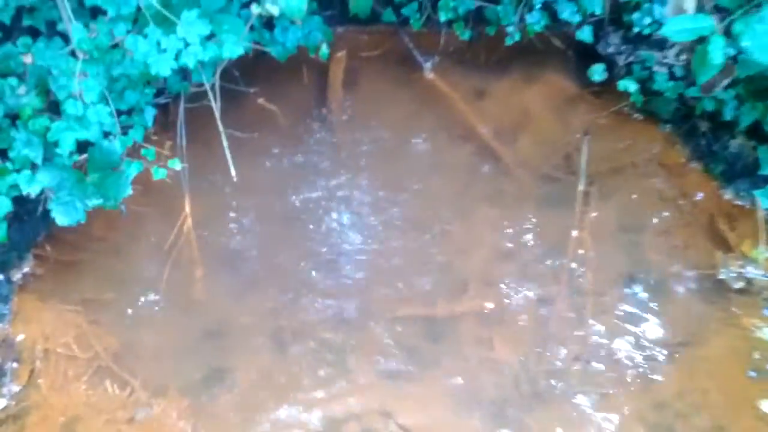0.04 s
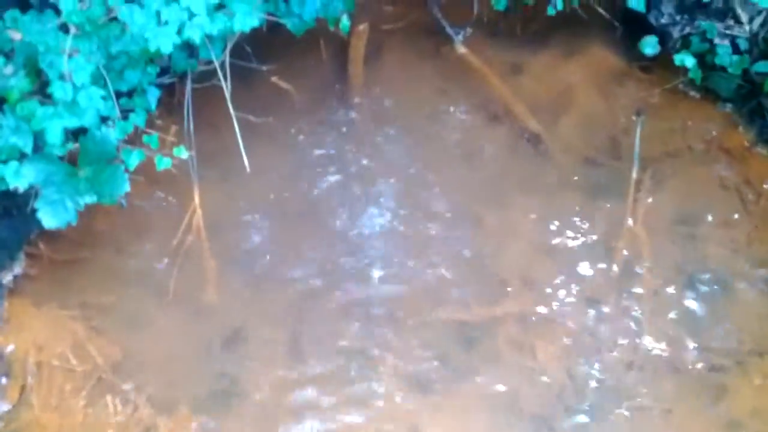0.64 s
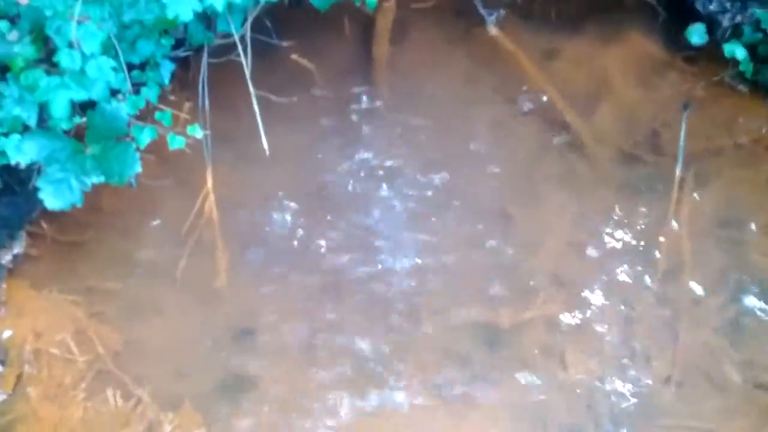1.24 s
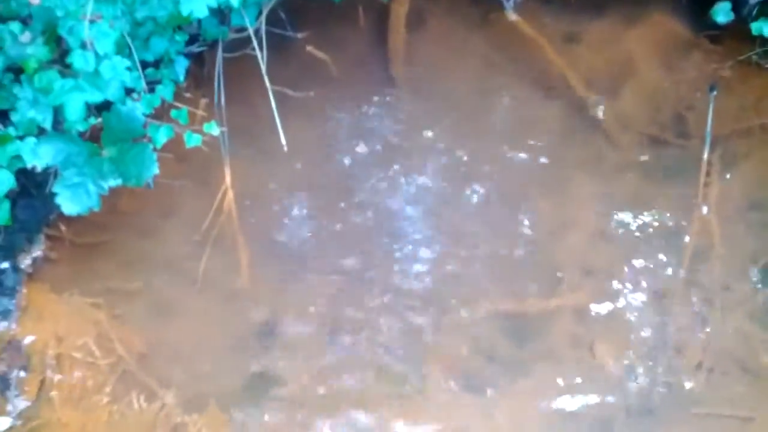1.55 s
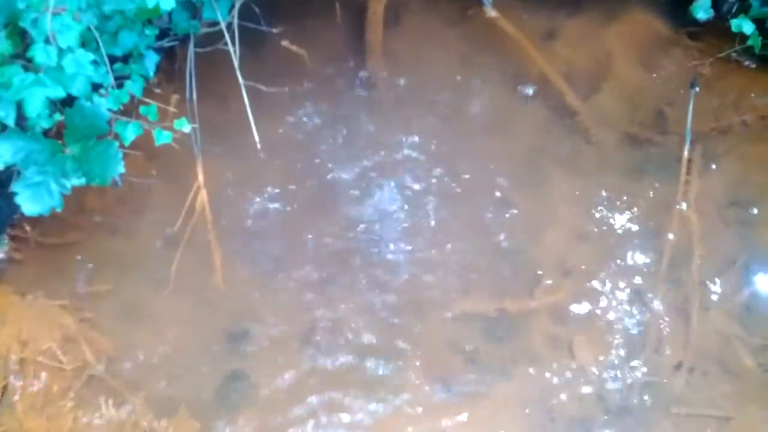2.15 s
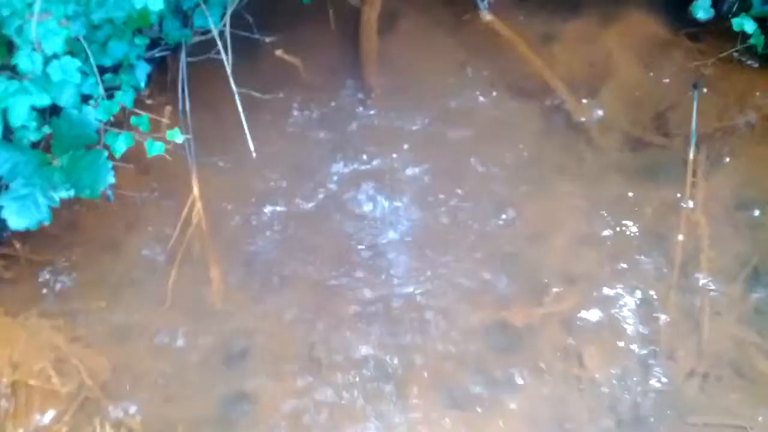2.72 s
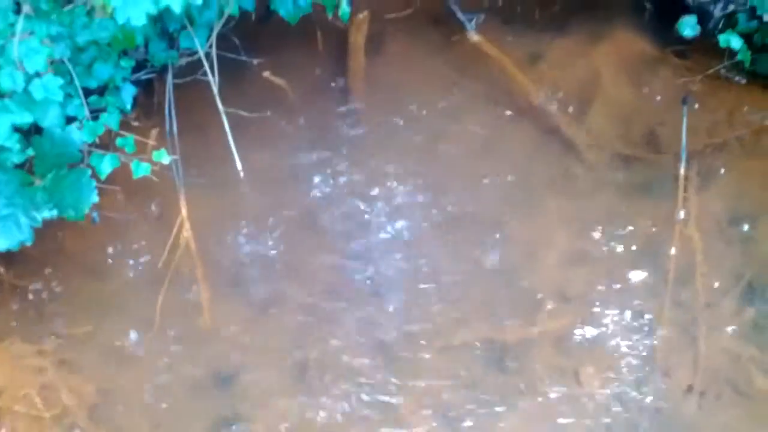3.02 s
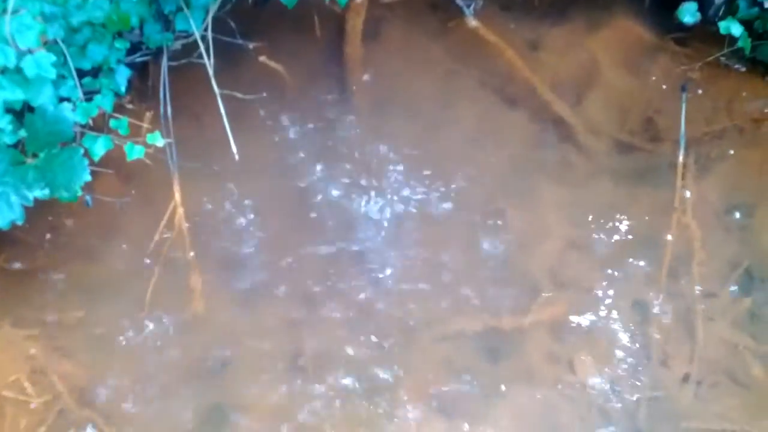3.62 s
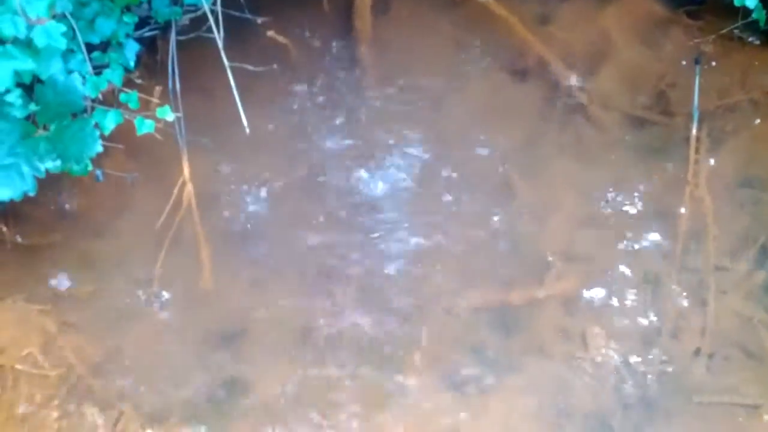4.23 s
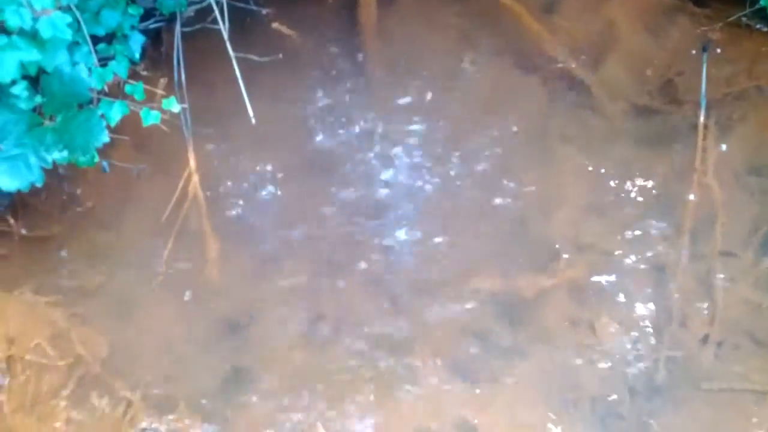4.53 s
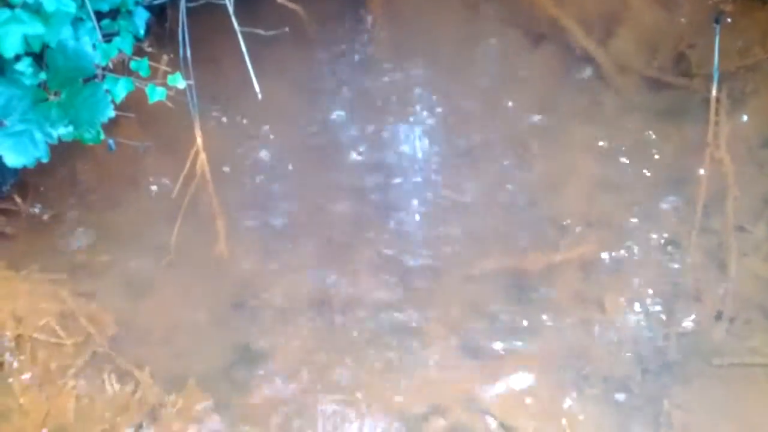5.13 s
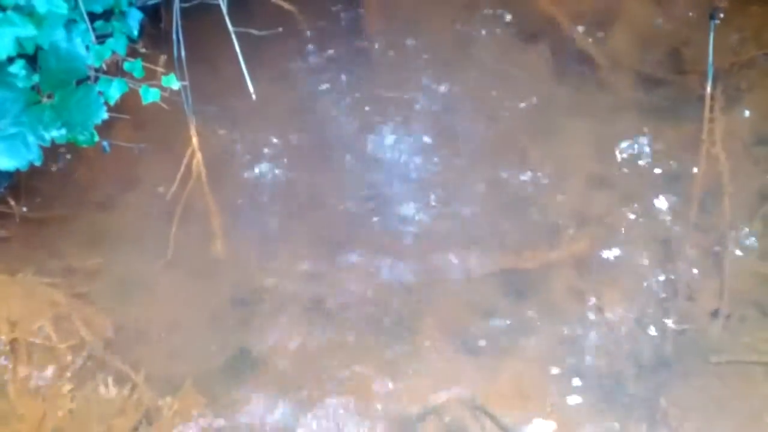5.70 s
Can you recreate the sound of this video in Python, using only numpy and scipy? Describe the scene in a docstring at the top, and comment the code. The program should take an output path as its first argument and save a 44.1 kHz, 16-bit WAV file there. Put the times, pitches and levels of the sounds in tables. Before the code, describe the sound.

Fingers knock and rub on a camera over the gentle gurgle, small blips and fine sizzle of welling water.

```python
"""A soft wash of tiny bubbles, single rising blips and a fine, fluttering sizzle: a shallow spring pool
wells up outdoors. Larger bubbles ring upward in pitch as they near the surface; minute ones burst in
flurries, and a few pop close by. Early on, fingers knock and rub on a handheld camera, sharp and loud
over the water. Faint low hums come and go over a rumble, and a thin whistle wavers in the first second."""
import sys
import numpy as np
from scipy.fft import rfft, irfft, next_fast_len
from scipy.io import wavfile
from scipy.ndimage import map_coordinates

SR = 44100
rng = np.random.default_rng(int(sys.argv[2]) if len(sys.argv) > 2 else 0)


def generate_wav(signal):
    """Clip the signal to [-1, 1] and save it as 16-bit WAV at the path in sys.argv[1]."""
    frames = np.transpose(np.atleast_2d(signal))
    scaled = np.clip(frames, -1, 1) * 32767
    pcm = np.round(scaled).astype(np.int16)
    wavfile.write(sys.argv[1], SR, pcm)


N = 262836

# strength of the welling flow: time_s, level_db
FLOW_LEVEL = [(0.0, -58), (1.78, -61), (4.23, -61.5), (5.06, -61.5), (5.96, -62)]
# tone colour of the wash: frequency_hz, level_db
WASH_SPECTRUM = [(60, -20), (100, 0.5), (150, -1.5), (260, -2), (400, -5.5), (560, -3.5), (730, -6.5),
                 (980, -3), (1500, -7.5), (2300, -16), (4500, -20), (8000, -21.5)]
# larger bubbles reaching the surface: start_s, middle_pitch_hz, level_db
RISING_BUBBLES = [(0.849, 1060, -50), (1.396, 569, -52.5), (1.785, 2560, -56), (1.797, 890, -50),
                  (2.295, 686, -47.5), (2.316, 965, -48.5), (2.529, 2800, -57.5), (2.714, 560, -49.5),
                  (3.015, 628, -53), (3.050, 1040, -52), (3.114, 525, -55.5), (3.187, 3130, -59),
                  (3.726, 1700, -54.5), (4.250, 1510, -52), (4.26, 2020, -58), (4.490, 577, -53.5),
                  (4.544, 1040, -52.5), (4.566, 1760, -58), (4.684, 555, -55), (4.756, 522, -54),
                  (5.148, 516, -49.5), (5.520, 592, -49.5), (5.548, 525, -52.5), (5.655, 528, -50)]
# tone colour of the sizzle: frequency_hz, level_db
SIZZLE_SPECTRUM = [(1500, -43), (3000, -20), (4600, -18), (6000, -13), (7400, -14), (9000, -8),
                   (10500, -3.5), (11900, 1.5), (14500, 1), (15800, -2.5)]
# small bubbles bursting close by: start_s, level_db, pitch_hz, t60_s
CLOSE_POPS = [(3.487, -42, 11100, 0.008), (3.744, -42.5, 11700, 0.021), (4.220, -44, 12500, 0.004),
              (4.382, -45, 9500, 0.018), (5.619, -44, 14000, 0.0082), (5.844, -55, 4010, 0.02)]
# fingers striking the camera: start_s, click_db, brightness_hz, thump_db, thump_pitch_hz
FINGER_KNOCKS = [(0.2482, -12.5, 3740, -18, 600), (0.2810, -48, 1200, -29.5, 550),
                 (0.3469, -44, 900, -19, 680), (0.3909, -19.5, 3080, -16.5, 870),
                 (0.3922, -27, 5500, -11, 234), (0.465, -52, 1500, -36, 280), (0.498, -52, 1200, -34, 229),
                 (0.5097, -52, 1200, -35.5, 340), (0.8703, -36, 2770, -41, 700),
                 (1.089, -7, 18000, -24.5, 455), (1.12, -40, 7000, -70, 500), (1.25, -13, 17800, -35, 387),
                 (1.2647, -19.5, 18000, -26.5, 830), (1.6690, -34, 1960, -48, 600)]
# ringing modes of the camera's shell: pitch_hz, level_db, t60_s
SHELL_MODES = [(486, -21, 0.036), (1220, -16, 0.013), (1693, -8, 0.0079), (2710, -3.5, 0.0044),
               (3580, -0.5, 0.0037), (6200, 2, 0.0015), (12240, -3.5, 0.0019), (14700, -0.5, 0.0013)]
# jolts as the grip shifts: start_s, level_db
GRIP_JOLTS = [(1.089, -23), (1.2503, -18)]
# skin sliding on the shell: start_s, length_s, level_db, brightness_hz
FINGER_RUBS = [(0.242, 0.011, -31.5, 4500), (0.341, 0.025, -41, 8000), (0.468, 0.05, -41, 900),
               (1.194, 0.09, -46.5, 14100), (1.235, 0.035, -29.5, 20000)]
# tone colour of a rub: frequency_hz, level_db
RUB_SPECTRUM = [(40, -13), (150, 2.5), (400, -3.5), (900, -5.5), (1600, -5.5), (2300, -14.5), (3800, -9),
                (6200, -15.5), (8000, -13), (12000, -3.5), (16000, -23)]
# low hums that swell and fade: start_s, attack_s, hold_s, release_s, start_pitch_hz, level_db
LOW_HUMS = [(-1.22, 3.46, .7, 2.75, 65.2, -60.5), (0.0, 0.98, 1.5, 0.76, 48.5, -64),
            (3, 1.06, 2.2, .5, 46.6, -61)]
# pitch line of the thin whistle: time_s, pitch_hz
WHISTLE_PITCH = [(0.10, 10950), (0.22, 10650), (0.36, 10100), (0.46, 10440), (0.53, 10050), (0.61, 10700),
                 (0.80, 10150)]
# tone colour of the rumble: frequency_hz, level_db
RUMBLE_SPECTRUM = [(15, 6.5), (40, 2), (90, -5.5), (140, -2.5), (300, -40), (1000, -74)]


def water():
    """The welling flow: a restless wash with tiny bubbles gurgling and tinkling in it."""
    wash_db, gurgle_db, tinkle_db = 3, -6.5, -18  # relative to the flow
    wash = coloured(rng.standard_normal(N), WASH_SPECTRUM)
    wash *= amp(wash_db + 0.65 * wobble(32) + 0.35 * wobble(5.38))
    gurgle = tiny_bubbles(count=1200, centre_hz=949.4, cycles=12, rise=0.21, spread_db=3)
    tinkle = tiny_bubbles(count=400, centre_hz=5720, cycles=37.5, rise=0.124, spread_db=3.5)
    return amp(curve(FLOW_LEVEL)) * (wash + amp(gurgle_db) * gurgle + amp(tinkle_db) * tinkle)


def tiny_bubbles(count, centre_hz, cycles, rise, spread_db):
    """A crowd of short, damped bubble tones, each gliding upward."""
    t = np.arange(SR // 40) / SR
    starts = rng.integers(0, N, (count, 1))
    pitch, strength = np.clip(rng.standard_normal((count, 2)), -2, 2).T[:, :, None]
    hz = centre_hz * 2 ** (0.701 * pitch)
    age = t * hz / cycles
    envelope = amp(spread_db * strength) * age * np.exp(-4 * age)
    tones = envelope * np.sin(2 * np.pi * hz * t * (1 + rise * age / 2))
    positions = starts + np.arange(len(t))
    return unit(np.bincount(positions.ravel(), tones.ravel(), minlength=N)[:N])


def blips():
    """A larger bubble rings ever higher as it nears the surface; its wobbling shape shakes the tone."""
    rise_oct_per_s = 8.7
    out = np.zeros(N)
    quiver, flutter_db = 1 + 0.038 * wobble(260), 2.5 * wobble(140)
    for start_s, middle_hz, db in RISING_BUBBLES:
        length_s = 0.045 * (500 / middle_hz) ** 0.57  # small, high bubbles die sooner
        progress = np.linspace(0, 1, int(length_s * SR))
        now = round(start_s * SR) + np.arange(len(progress))
        hz = middle_hz * 2 ** (rise_oct_per_s * length_s * (progress - 0.5)) * quiver[now]
        envelope = np.sin(np.pi * progress) * (1 - progress / 2)
        add(out, start_s, amp(db + flutter_db[now]) * envelope * sine(hz))
    return out


def sizzle():
    """Minute bursts come in flurries, stronger with the flow; coarse and fine ones flutter partly apart."""
    lull_at_s, lull_width_s, lull_depth_db = 1.48, 0.14, 4  # one brief dip in level
    lull_db = lull_depth_db * np.exp(-((np.arange(N) / SR - lull_at_s) / lull_width_s) ** 2)
    flow_db = curve(FLOW_LEVEL)
    level_db = -48 + 0.25 * (flow_db - flow_db.mean()) - lull_db
    fizz = crackle(N, per_s=5000, spread_db=5) + 0.5 * rng.standard_normal(N)
    ticks = 0.42 * crackle(N, per_s=150, spread_db=3.5)
    bursts = coloured(fizz + ticks, SIZZLE_SPECTRUM)
    coarse = filtered(bursts, lambda hz: 1 / (1 + (hz / 11000) ** 12))
    fine = bursts - coarse
    fluttering = coarse * amp(0.8 * wobble(60)) + fine * amp(0.46 * wobble(70))
    flurries_db = 0.62 * np.tanh(wobble(34)) + 3 * np.tanh(wobble(85)) + 0.91 * wobble(240)
    return amp(level_db) * unit(fluttering * amp(flurries_db))


def pops():
    """A bubble's film tears with a short, high spit."""
    out, t = np.zeros(N), np.arange(SR // 20) / SR
    for start_s, db, hz, t60_s in CLOSE_POPS:
        spit = coloured(rng.standard_normal(len(t)), [(hz / 2, -22), (hz, 0), (hz * 2, -35)])
        add(out, start_s, amp(db - 60 * t / t60_s) * spit)
    return out


def knocks():
    """A finger rings the shell and thumps it against the grip; a soft touch loses the high modes."""
    rise_cycles, after_ring_cycles = 0.41, 1.3  # the hand damps the thump quickly
    out, t = np.zeros(N), np.arange(SR // 20) / SR
    for start_s, click_db, bright_hz, thump_db, thump_hz in FINGER_KNOCKS:
        click = np.zeros(len(t))
        for k, (hz, db, t60_s) in enumerate(SHELL_MODES):
            fingertip_spring = 1 / np.hypot(1 - (hz / bright_hz) ** 2, 0.89 * hz / bright_hz)
            decay = amp(db + rng.normal(0, 0.42) - 60 * t / t60_s)
            click += (-1) ** k * fingertip_spring * decay * np.sin(2 * np.pi * hz * t)
        age = t * thump_hz / rise_cycles
        punch = age ** 2 * np.exp(2 - 2 * age)
        after_ring = amp(-16) * np.tanh(age) * np.exp(-t * thump_hz / after_ring_cycles)
        thump = (punch + after_ring) * np.sin(2 * np.pi * thump_hz * t)
        add(out, start_s, amp(click_db) * click + amp(thump_db) * thump)
    return out


def jolts():
    """A shift of the grip gives the microphone one low push."""
    rise_s = 0.00044
    out, age = np.zeros(N), np.arange(SR // 20) / SR / rise_s
    for start_s, db in GRIP_JOLTS:
        add(out, start_s, amp(db) * age * np.exp(1 - age))
    return out


def rubs():
    """A finger slips over the shell in dense little catches; a light touch sounds dull."""
    out = np.zeros(N)
    for start_s, length_s, db, bright_hz in FINGER_RUBS:
        slips = coloured(crackle(SR // 8, per_s=7000, spread_db=6.5), RUB_SPECTRUM)
        slips = filtered(slips, lambda hz: 1 / np.hypot(1, hz / bright_hz))[:int(length_s * SR)]
        progress = np.linspace(0, 1, len(slips))
        stroke = np.abs(np.sin(np.pi * progress ** 1.4)) ** 0.5
        add(out, start_s, amp(db) * stroke * slips)
    return out


def hums():
    """Low, wavering hums slowly sag in pitch, like far-off motors."""
    sag_hz_per_s, waver_hz = 0.5, 0.6
    out = np.zeros(N)
    for start_s, attack_s, hold_s, release_s, start_hz, db in LOW_HUMS:
        t = np.arange(N) / SR - start_s
        envelope = amp(db + 2.05 * wobble(4)) * swell(t, attack_s, hold_s, release_s)
        hz = start_hz - sag_hz_per_s * t + waver_hz * wobble(6)
        out += envelope * np.sqrt(2) * sine(hz)
    return out


def whistle():
    """A thin, very high tone trembles in pitch and level."""
    start_s, end_s, fade_s = WHISTLE_PITCH[0][0], WHISTLE_PITCH[-1][0], 0.05
    envelope = swell(np.arange(N) / SR - start_s, fade_s, end_s - start_s - 2 * fade_s, fade_s)
    level_db = -65 + 2 * wobble(27.7)
    hz = curve(WHISTLE_PITCH) + 30 * wobble(130)
    return amp(level_db) * envelope * np.sqrt(2) * sine(hz)


def rumble():
    """A faint, steady bed of deep noise."""
    return amp(-65) * coloured(rng.standard_normal(N), RUMBLE_SPECTRUM)


def amp(db):
    """Decibels to gain."""
    return 10 ** (np.asarray(db) / 20)


def unit(x):
    """Scale to rms 1."""
    return x / np.sqrt(np.mean(x ** 2) + 1e-20)


def sine(hz):
    """A tone that follows a pitch curve."""
    return np.sin(2 * np.pi * np.cumsum(hz) / SR)


def curve(points):
    """Join (time_s, value) points into one value per sample."""
    return np.interp(np.arange(N) / SR, *np.transpose(points))


def swell(t, attack, hold, release):
    """Rise, hold and fall between 0 and 1, starting at t = 0."""
    return np.clip(np.minimum(t / attack, 1 - (t - attack - hold) / release), 0, 1)


def wobble(per_s):
    """A smooth drift through per_s random values a second."""
    return map_coordinates(rng.standard_normal(int(N * per_s / SR) + 4), [np.arange(N) * per_s / SR])


def crackle(size, per_s, spread_db):
    """Scattered tiny impulses of uneven strength, at rms 1."""
    chance, strength, sign = rng.random(size), rng.standard_normal(size), rng.choice([-1, 1], size)
    return unit((chance < per_s / SR) * sign * amp(spread_db * np.clip(strength, -2.5, 2.5)))


def filtered(x, response):
    """Pass x through a frequency response."""
    size = next_fast_len(len(x) + 8192)
    return irfft(rfft(x, size) * response(np.fft.rfftfreq(size, 1 / SR)), size)[:len(x)]


def coloured(x, spectrum):
    """Equalise x with (frequency_hz, level_db) points, at rms 1."""
    points_hz, db = np.transpose(spectrum)
    return unit(filtered(x, lambda hz: amp(np.interp(np.log(hz + 1), np.log(points_hz), db))))


def add(track, start_s, sound):
    """Mix a sound into the track at start_s."""
    part = track[max(round(start_s * SR), 0):][:len(sound)]
    part += sound[:len(part)]


def scene():
    """Pool, handling and background at one microphone, which thins the handling's deepest bass."""
    low_cut_hz = 35
    handling = filtered(knocks() + jolts() + rubs(), lambda hz: 1j * hz / (low_cut_hz + 1j * hz))
    pool = water() + sizzle() + blips() + pops()
    return (pool + handling + hums() + whistle() + rumble())[None]


def record(dry):
    """The camera cuts off the very top of the treble."""
    top_hz = 15850
    return np.array([filtered(channel, lambda hz: hz < top_hz) for channel in dry])


dry = scene()
out = record(dry)
generate_wav(out)
```